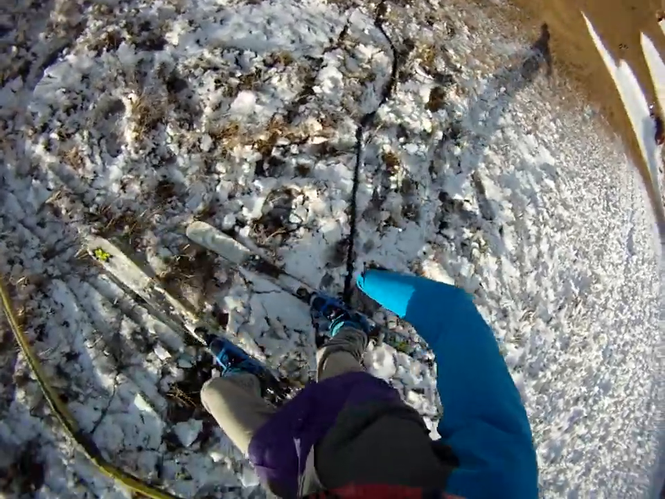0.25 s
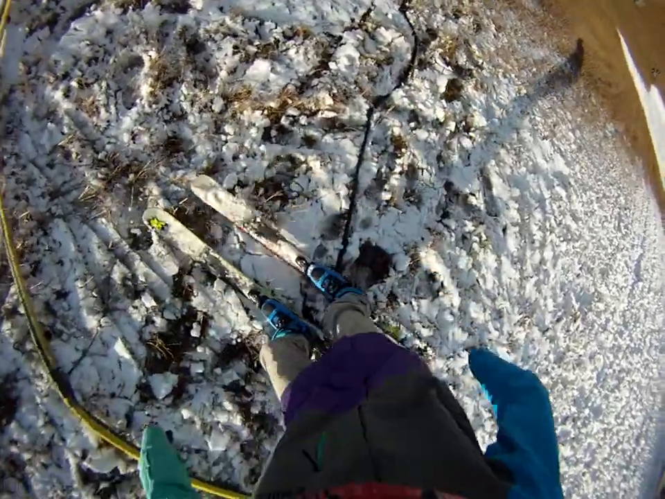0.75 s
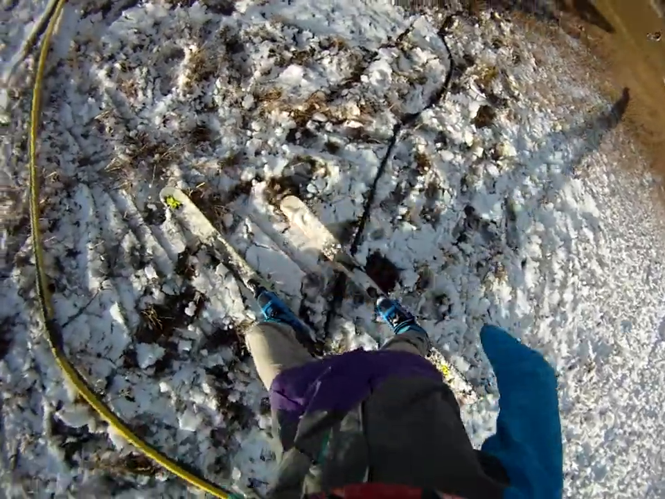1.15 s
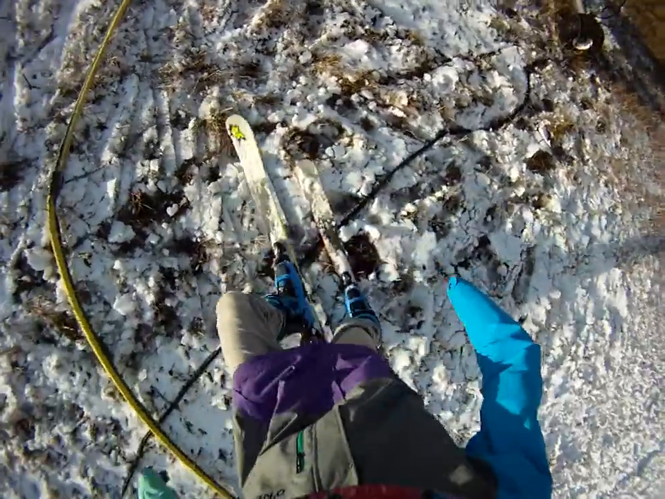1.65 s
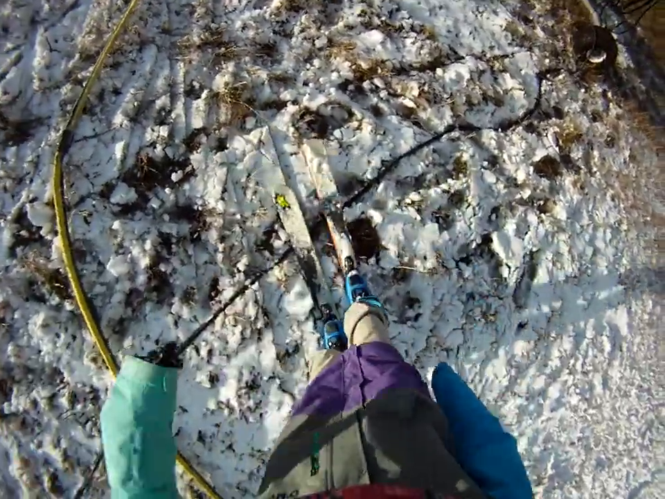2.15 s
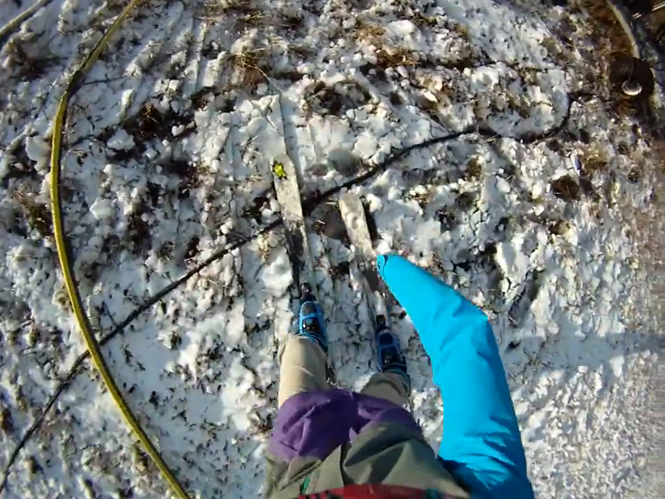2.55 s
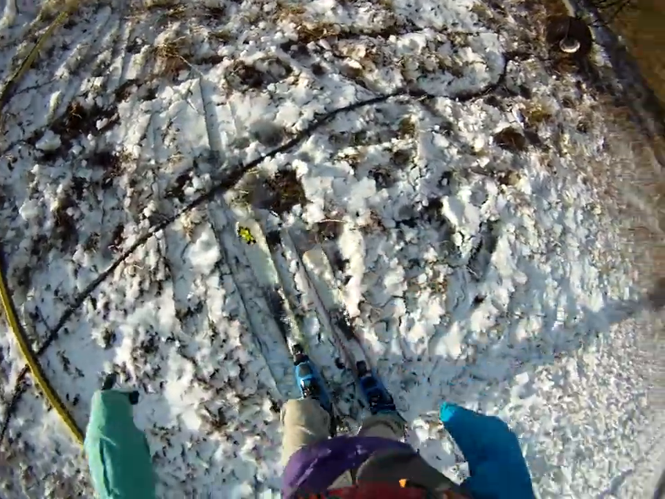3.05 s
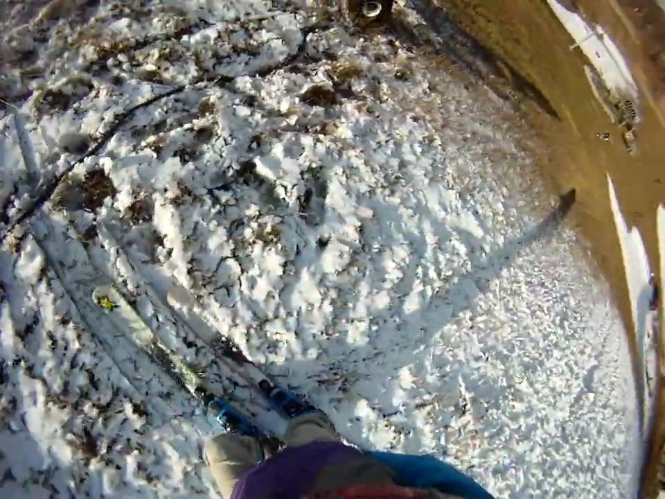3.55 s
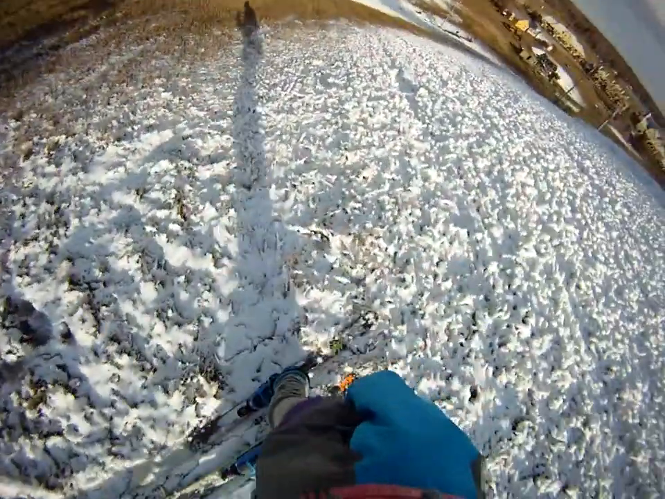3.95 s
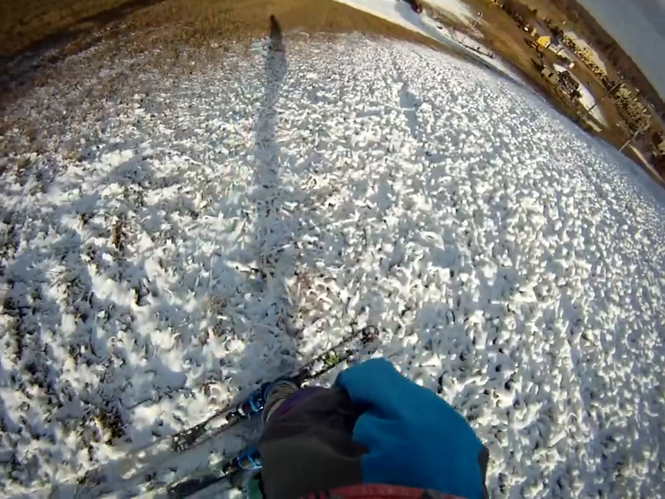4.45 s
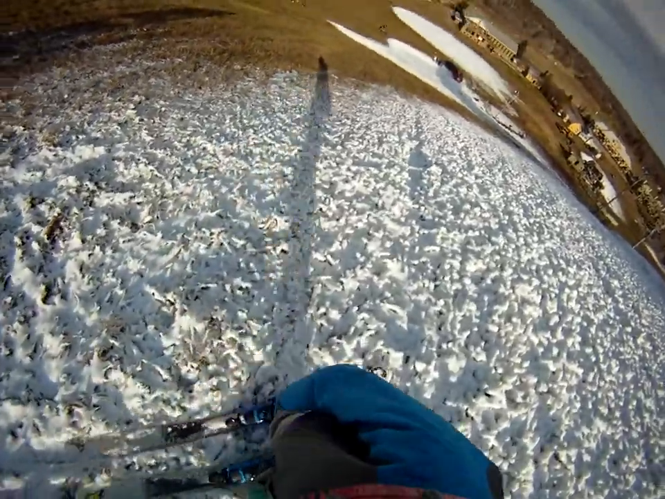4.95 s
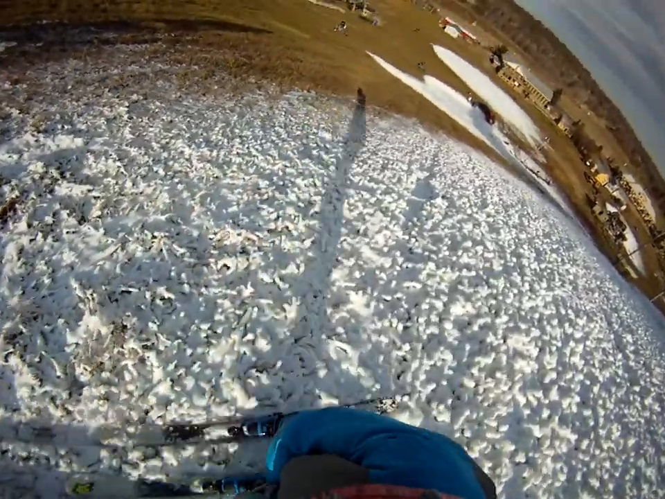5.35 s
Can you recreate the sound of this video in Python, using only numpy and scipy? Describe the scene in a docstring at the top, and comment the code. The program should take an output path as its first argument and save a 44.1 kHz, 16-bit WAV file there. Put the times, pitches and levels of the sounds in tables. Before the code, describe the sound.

Low wind and faint rapid ticking, then a hard knock on a camera case as skis scrape and crunch through a short turn.

```python
"""A skier shuffles round on thin snow, heard through the closed case of a body-worn camera. Low wind rumble,
hiss and a faint fast ticking run from the start, with a few small pushes and light knocks. At 3.4 s a hard
knock rings the case and starts a half-second turn: the skis scrape and crunch, the wind swells and the camera
thumps on its mount. Faint pushes and knocks follow as the ticking recedes."""
import sys
import numpy as np
from scipy import signal
from scipy.fft import rfft, irfft
from scipy.io import wavfile
from scipy.ndimage import uniform_filter1d

SR = 44100
rng = np.random.default_rng(int(sys.argv[2]) if len(sys.argv) > 2 else 0)


def output_pcm(signal):
    """Save a mono or channel-first signal as 16-bit PCM at the path in sys.argv[1].

    Samples are clipped to [-1, 1] before scaling.
    """
    pcm = np.clip(np.atleast_2d(signal).T, -1, 1) * 32767
    wavfile.write(sys.argv[1], SR, np.round(pcm).astype(np.int16))


N = 246519
T = np.arange(N) / SR
HZ = np.fft.rfftfreq(N, 1 / SR)


# ski pushes: start_s, length_s, level_db, edge_bite_share
SKI_PUSHES = [(0.311, 0.023, -57.5, 0), (.86, 0.19, -63, .95), (3.049, 0.036, -56.5, .5),
              (3.469, 0.075, -35.5, 0.05), (3.659, 0.11, -34, 0.86), (3.959, 0.059, -52, 0.5),
              (4.382, 0.059, -57.5, .9), (4.629, 0.024, -55.5, 0.83), (5.322, 0.052, -56, .6)]
# flat ski on snow: freq_hz, level_db
GLIDE_SPECTRUM = [(300, -14), (600, -2), (1000, -3.5), (1700, 3.5), (2300, 6.5), (3500, -5.5), (5200, -8),
                  (5700, -35)]
# biting edge on snow: freq_hz, level_db
EDGE_SPECTRUM = [(150, 20.5), (420, 19), (580, 2.5), (1000, -8.5), (1700, 0), (2300, 3), (2830, 8),
                 (4200, 9.5), (5200, 16.5), (5700, -8)]

def skis(build_share=0.58, bite_exponent=1.14):
    """Each push builds, holds and runs out. Flat skis rub dully; biting edges scrape more brightly."""
    power, edge_power = np.zeros(N), np.zeros(N)
    for start_s, length_s, level_db, bite in SKI_PUSHES:
        progress = (T - start_s) / length_s
        speed = np.clip(progress / build_share, 0, 1) * np.exp(-np.maximum(progress - 1, 0))
        push_power = (amp(level_db) * speed) ** 2
        power += push_power
        edge_power += push_power * bite * speed ** bite_exponent  # edge lets go before the ski stops
    glide = np.sqrt(abs(power - edge_power)) * coloured(crunch(), GLIDE_SPECTRUM, case(HZ))
    scrape = np.sqrt(edge_power) * coloured(crunch(), EDGE_SPECTRUM, case(HZ))
    return glide + scrape


def crunch(grains_per_s=1200, scratch_db=2):
    """Snow crystals break over a smooth rub; each short scratch favours its own band."""
    grains = noise() * (rng.random(N) < grains_per_s / SR)
    bands = signal.stft(evened(grains) + noise(), nperseg=256)[2]
    scratches = uniform_filter1d(rng.standard_normal(bands.shape), size=3, axis=0)
    scratches = evened(uniform_filter1d(scratches, size=4, axis=1))
    return signal.istft(bands * amp(scratch_db * scratches), nperseg=256)[1][:N]


# knocks on the case: start_s, level_db, base_contact_s, base_centre_hz
CASE_KNOCKS = [(1.4707, -44, 0.0031, 1300), (1.4963, -41, .0026, 1760), (3.3845, -28.5, 0.0033, 2600),
               (3.4009, -15.5, 0.0025, 1110), (3.461, -31, 0.0027, 2000), (3.489, -32, 0.0021, 2220),
               (3.591, -36.5, 0.0026, 3260), (3.8235, -24.5, 0.0048, 1930), (3.899, -38.5, 0.0043, 2600),
               (4.334, -43.5, 0.0037, 1550), (4.534, -44, 0.004, 1590)]
# bright graze, blow, loose rebound: delay_s, gain_db, contact_ratio, centre_ratio
KNOCK_CONTACTS = [(-.0018, -11.5, 0.61, 2.2), (0, 0, 1.2, 0.91), (.0148, -22.5, 2.4, 1.6)]

def knocks(gritty_s=0.0015, focus_db=8, reach_octaves=0.94, shelf_hz=947):
    """Each knock rings the modes of the case, most near one pitch; longer contacts are grittier."""
    out, t = np.zeros(N), np.arange(4096) / SR
    hz = np.fft.rfftfreq(len(t), 1 / SR) + 1
    body = case(hz) / np.sqrt(1 + np.minimum(shelf_hz / hz, 1.04) ** 16)  # stiff wall gives less bass
    for start_s, level_db, base_contact_s, base_centre_hz in CASE_KNOCKS:
        for delay_s, gain_db, contact_ratio, centre_ratio in KNOCK_CONTACTS:
            contact_s, centre_hz = base_contact_s * contact_ratio, base_centre_hz * centre_ratio
            grit = rng.standard_normal(len(t)) * np.exp(-t / contact_s)
            force = (t == 0) + contact_s / gritty_s * grit / np.linalg.norm(grit)
            octaves_off = np.minimum(abs(np.log2(hz / centre_hz)), reach_octaves)
            colour = amp(-focus_db * octaves_off ** 2)
            ring = irfft(rfft(force) * causal(body * colour))
            ring /= np.std(ring[:SR // 200])  # rms 1 over the first 5 ms
            add(out, start_s + delay_s, amp(level_db + gain_db) * ring)
    return out


# jolts of the camera mount: start_s, ring_db, shove_db
MOUNT_JOLTS = [(.87, -38.5, -60), (1.256, -41.5, -68), (3.395, -14, -4.5), (3.486, -33, -46),
               (3.68, -20, -40), (3.711, -19.5, -27.5), (3.7582, -13.5, -45), (3.7798, -7.5, -28),
               (3.890, -16, -55), (4.984, -47.5, -58)]

def thumps(ring_hz=68, t60_s=0.31, attack_s=0.0072, shove_s=0.0019, shove_at_s=0.00836,
           plop_hz=255, plop_db=-18, plop_s=0.0032):
    """A jolt shoves the case to and fro once with a hollow plop, then it swings on its mount."""
    out, t = np.zeros(N), np.arange(SR // 2) / SR
    onset = 1 - np.exp(-(t / attack_s) ** 2)
    ring = -np.sin(2 * np.pi * ring_hz * t) * amp(-60 * t / t60_s)
    lag_s = t - shove_at_s
    shove = lag_s / shove_s * np.exp((1 - (lag_s / shove_s) ** 2) / 2)
    plop = amp(plop_db) * np.sin(2 * np.pi * plop_hz * lag_s) * np.exp(-abs(lag_s) / plop_s)
    for start_s, ring_db, shove_db in MOUNT_JOLTS:
        add(out, start_s, onset * (amp(ring_db) * ring + amp(shove_db) * (shove + plop)))
    return out


# wind on the case: freq_hz, level_db
WIND_SPECTRUM = [(8, -0.5), (25, 1), (45, 2.5), (65, -1.5), (90, -14.5), (140, -21.5), (250, -24.5),
                 (500, -40), (900, -37.5), (3000, -36)]

def wind(base_db=-52, gust_db=14.5, lee_db=1.5, lump_db=2, turn_s=3.59, turn_half_s=0.26):
    """Lumpy rumble on the case; it swells in the turn and is weaker afterwards."""
    turn = (T - turn_s) / turn_half_s
    level_db = base_db + gust_db * np.exp(-turn ** 2) - lee_db * (1 + np.tanh(turn)) / 2
    return amp(level_db + lump_db * wander(hz=2.5)) * coloured(noise(), WIND_SPECTRUM)


# tick pace, sagging briefly after the turn: time_s, ticks_per_s
TICK_PACE = [(0, 26.65), (3.9, 26.2), (4.45, 24.85), (5.1, 27.05)]
# tick rasp: freq_hz, level_db
RASP_SPECTRUM = [(400, -27), (1100, -10.5), (1700, -12), (2050, 0), (2400, -1), (2800, -4.5), (3500, -2),
                 (5500, -17)]

def ticking(peak_db=-57.5, peak_s=2.1, swell_db_per_s=3, fade_db_per_s=2.5, uneven_db=1.5,
            rise_cycles=0.061, hold_cycles=0.22, fall_cycles=0.12, squeak_hz=2150, squeak_gain=0.8):
    """Fast ticking swells, then recedes; each tick is a short rasp with a squeak of unsteady pitch."""
    level_db = peak_db + np.minimum(swell_db_per_s * (T - peak_s), fade_db_per_s * (peak_s - T))
    ticks_per_s = np.interp(T, *np.transpose(TICK_PACE))
    cycle = (np.cumsum(ticks_per_s) / SR - 0.01) % 1
    pulse = np.minimum(cycle / rise_cycles, 1) * np.exp(-np.maximum(cycle - hold_cycles, 0) / fall_cycles)
    rasp = coloured(noise() * pulse, RASP_SPECTRUM, case(HZ))
    pitch_hz = squeak_hz * (1 + 0.045 * wander(hz=39.9))
    squeak = evened(pulse * np.sin(2 * np.pi * np.cumsum(pitch_hz) / SR))
    return amp(level_db + uneven_db * wander(hz=6.6)) * evened(rasp + squeak_gain * squeak)


# open air outside the case: freq_hz, level_db
AIR_SPECTRUM = [(500, 16.5), (870, 1), (1100, -4), (1700, -5.5), (2150, 2.5), (2500, -1), (3300, -3),
                (5400, 8.5)]
# steady hiss: freq_hz, level_db
HISS_SPECTRUM = [(150, 8), (400, 3.5), (700, 2), (1300, -3.5), (3000, -5.5), (4500, -15), (5500, -15.5)]

def hiss(hiss_db=-67.5, air_db=-61, flutter_db=1):
    """Steady hiss, and the open air whispering through the case."""
    air = amp(air_db + flutter_db * wander(hz=25.3)) * coloured(noise(), AIR_SPECTRUM, case(HZ))
    return air + amp(hiss_db) * coloured(noise(), HISS_SPECTRUM)


# case resonances: freq_hz, half_width_hz, level_db
CASE_MODES = [(874, 47, -2.5), (1017, 81, 2.5), (1176, 84, 3.5), (1536, 224, 3), (1702, 126, 6.5),
              (2093, 183, -1), (2260, 49, -17), (2399, 124, 0), (2810, 150, -4.5), (3180, 74, -9.5),
              (3490, 236, -7), (3950, 490, -14.5), (4060, 220, -21), (4810, 40, -22.5), (4800, 110, -26)]

def case(hz, leak_db=-28):
    """Sound passes the case at its modes and leaks weakly between them."""
    mode_power = sum((amp(level_db) / (1 + ((hz - freq_hz) / half_width_hz) ** 2)) ** 2
                     for freq_hz, half_width_hz, level_db in CASE_MODES)
    return np.sqrt(amp(leak_db) ** 2 + mode_power)


def amp(db):
    """Decibels to gain."""
    return 10 ** (np.asarray(db) / 20)


def evened(x):
    """Scales to rms 1."""
    return x / np.sqrt(np.mean(x ** 2) + 1e-20)


def noise():
    """White noise."""
    return rng.standard_normal(N)


def wander(hz):
    """Random drift up to about this rate, rms 1."""
    return evened(irfft(rfft(noise()) * np.exp(-(HZ / hz) ** 2), N))


def coloured(x, spectrum, path_gain=1):
    """Filters x by a spectrum and by its path, to rms 1."""
    freq_hz, level_db = np.transpose(spectrum)
    gain = amp(np.interp(np.log(HZ + 1), np.log(freq_hz + 1), level_db))
    return evened(irfft(rfft(x) * gain * path_gain, N))


def causal(gain):
    """Minimum-phase filter: rings only after it is struck."""
    log_gain = np.log(gain + 1e-6)
    mirrored = np.concatenate([log_gain, log_gain[-2:0:-1]])
    return np.exp(np.conj(signal.hilbert(mirrored)))[:len(gain)]


def low_pass(x, hz):
    """Steep low-pass."""
    return signal.oaconvolve(x, signal.firwin(301, hz, window=("kaiser", 8), fs=SR), "same")


def add(mix, start_s, sound):
    """Lays a sound into the mix."""
    part = mix[max(round(start_s * SR), 0):][:len(sound)]
    part += sound[:len(part)]


def scene():
    """Everything reaches one microphone inside the case."""
    mono = wind() + hiss() + ticking() + skis() + knocks() + thumps()
    return np.array([mono, mono])


def record(dry, input_band_hz=5800, output_band_hz=15450, stereo_hiss_db=-80, right_db=0.12):
    """The camera samples at 12 kHz and holds each sample, mirroring the sound into a glassy treble."""
    out = []
    for channel, gain in zip(dry, (1, amp(right_db))):
        sampled = signal.resample_poly(low_pass(channel, input_band_hz), 40, 147, window=("kaiser", 3))
        # very faint hiss, different in left and right
        sampled = gain * sampled + amp(stereo_hiss_db) * rng.standard_normal(len(sampled))
        held = signal.resample_poly(np.repeat(sampled, 4), 147, 160)[:N]
        out.append(low_pass(held, output_band_hz))
    return np.array(out)


dry = scene()
out = record(dry)
output_pcm(out)
```